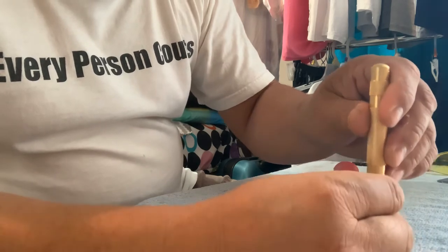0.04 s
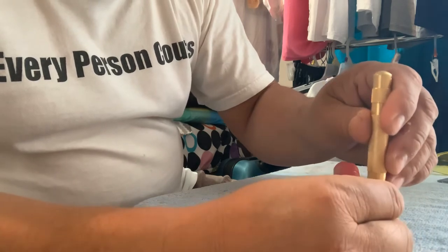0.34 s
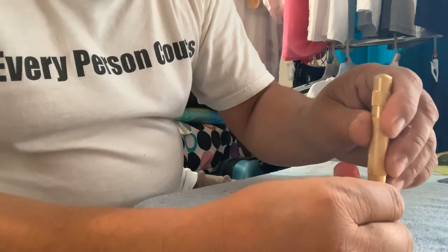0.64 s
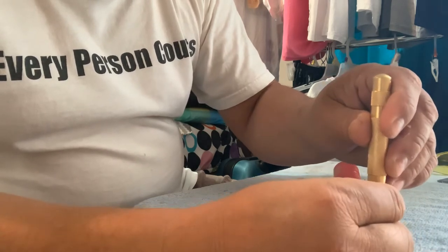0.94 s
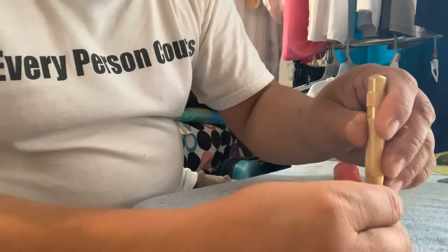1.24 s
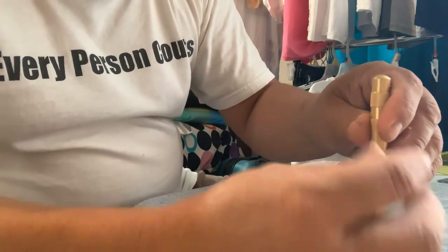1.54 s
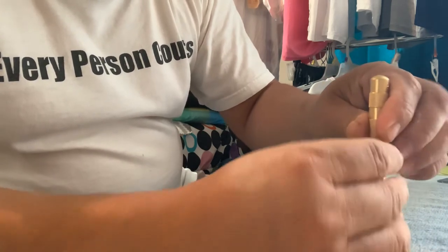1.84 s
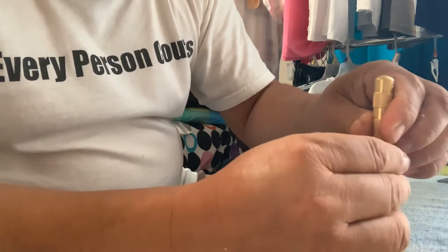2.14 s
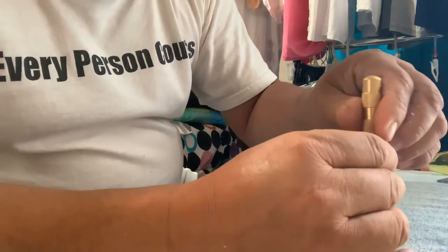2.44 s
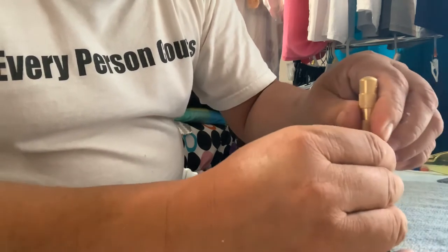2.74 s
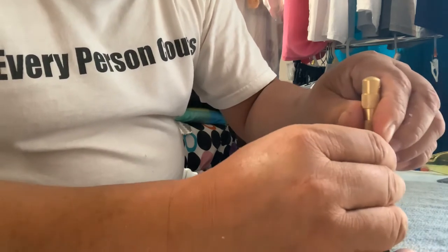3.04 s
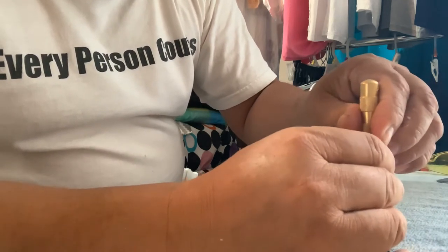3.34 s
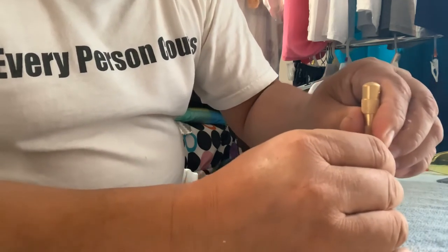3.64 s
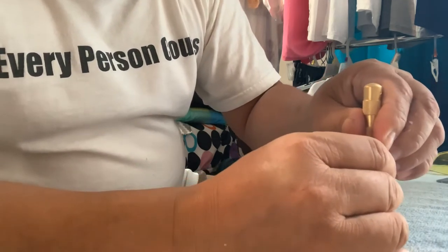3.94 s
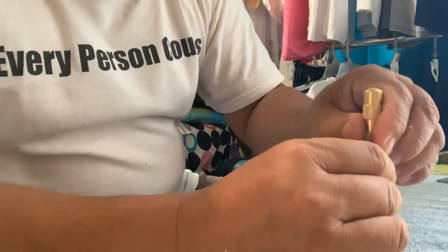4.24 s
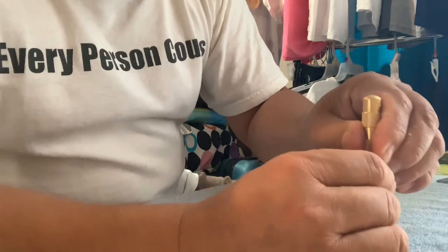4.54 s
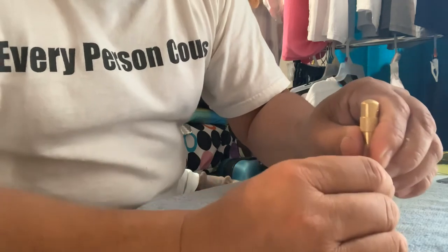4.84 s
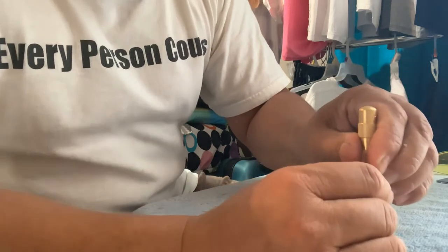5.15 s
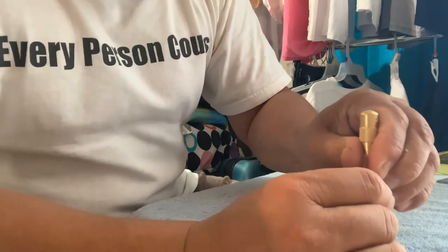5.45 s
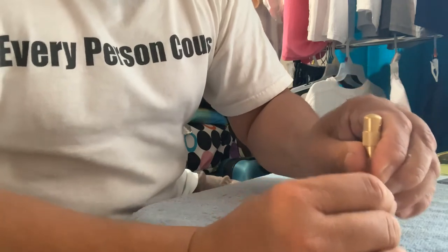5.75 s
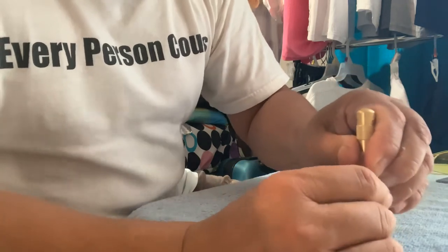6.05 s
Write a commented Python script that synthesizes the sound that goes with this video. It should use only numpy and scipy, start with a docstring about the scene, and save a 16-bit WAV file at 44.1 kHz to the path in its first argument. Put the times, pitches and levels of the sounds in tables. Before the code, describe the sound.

Soft, scattered clicks and muffled knocks sound close up as a brass punch is set against a workpiece on a cloth-covered table. Metal rubs and squeaks lightly as the spring is pressed down, until the punch trips with a single loud crack. The table thumps and the spring rings faintly, with a short reflection from the small room. A low motor hum continues underneath.

```python
"""A small room, the microphone close to a workpiece on a cloth-covered table; a motor hums behind.
The tip of a brass spring-loaded centre punch taps and slides into place, and the plunger rubs in its
barrel as the spring is pressed down. The hammer trips with one sharp snap: the table thumps, barrel and
spring ring on faintly, and the walls give a short reflection."""
import sys
import numpy as np
from scipy import signal
from scipy.fft import rfft, irfft
from scipy.io import wavfile

SR = 44100
rng = np.random.default_rng(int(sys.argv[2]) if len(sys.argv) > 2 else 0)


def digitize_waveform(pressure):
    """Quantize a signal to 16-bit integers and store it at the path in sys.argv[1].

    Rows of a 2-D input are taken as channels; values are limited to [-1, 1].
    """
    field = np.atleast_2d(pressure).T
    bounded = np.clip(field, -1, 1)
    quanta = np.round(bounded * 32767).astype(np.int16)
    wavfile.write(sys.argv[1], SR, quanta)


N = 268569
TIME = np.arange(N) / SR


def from_db(db):
    return 10 ** (np.asarray(db) / 20)


def rms_one(x):
    return x / np.sqrt(np.mean(x ** 2) + 1e-20)


def decay(t, t60):
    return np.exp(-np.log(1000) * t / t60)


def at_hz(points, hz):
    """Read a table on a log-frequency axis."""
    grid, values = np.transpose(points)
    return np.interp(np.log(np.maximum(hz, 1)), np.log(grid), values)


def highpass(x, hz, order=2):
    return signal.sosfilt(signal.butter(order, hz, "high", fs=SR, output="sos"), x + 1e-18)


def add(track, start_s, sound):
    start = round(start_s * SR)
    track[start:start + len(sound)] += sound[:N - start]


def noise(spectrum, size=N):
    """Steady noise of a given colour, rms 1."""
    hz = np.linspace(0, SR / 2, size // 2 + 1)
    phases = np.exp(2j * np.pi * rng.random(len(hz)))
    return rms_one(irfft(from_db(at_hz(spectrum, hz)) * phases, size))


def drift(rate_hz):
    """A random wander with a spread of about 1."""
    return np.interp(TIME * rate_hz, np.arange(4096), rng.standard_normal(4096))


def ring(force, modes):
    """Damped resonances; a unit click starts each at its listed level."""
    out = 0
    for hz, db, t60 in modes:
        radius, angle = decay(1 / SR, t60), 2 * np.pi * hz / SR
        feedback = [1, -2 * radius * np.cos(angle), radius ** 2]
        out += from_db(db) * signal.lfilter([0, np.sin(angle)], feedback, force + 1e-18)
    return out


def burst(t60, size=2048):
    """The dense, quickly dying chatter of one contact: even spectrum, unit energy."""
    fade = decay(TIME[:size], t60)
    phases = np.angle(rfft(rng.standard_normal(size) * fade))
    even = irfft(np.exp(1j * phases)) * np.sqrt(fade)
    return even / np.linalg.norm(even)


def coloured(x, spectrum):
    """Colour a short sound without letting it start early (minimum phase)."""
    half = len(x) // 2
    gain = from_db(at_hz(spectrum, np.linspace(0, SR / 2, half + 1)))
    cepstrum = irfft(np.log(gain))
    cepstrum[1:half] *= 2
    cepstrum[half + 1:] = 0
    return irfft(rfft(x) * np.exp(rfft(cepstrum)))


def swells(rows, waver_db, wander_rad):
    """Short wavering tones that swell and fade."""
    out = np.zeros(N)
    waver, phase = from_db(waver_db * drift(90)), wander_rad * drift(48)
    for peak_s, hz, db, half_width_s in rows:
        on = np.abs(TIME - peak_s) < 3.5 * half_width_s
        level = from_db(db) * waver[on] * np.exp(-((TIME[on] - peak_s) / half_width_s) ** 2)
        out[on] += level * np.sqrt(2) * np.sin(2 * np.pi * hz * TIME[on] + phase[on])
    return out


# the motor in the background: pitch_hz, level_db
MOTOR_PARTIALS = [(39.7, -77), (79.5, -66.5), (117.5, -54), (234.8, -68), (293.3, -73.5)]

def motor_hum(waver_db):
    """The partials sway together in pitch, each wavering in level on its own."""
    out, swaying_time = 0, TIME + 0.0012 * drift(3.3)
    for hz, db in MOTOR_PARTIALS:
        level = from_db(db + waver_db * drift(8))
        out += level * np.sqrt(2) * np.sin(2 * np.pi * hz * swaying_time + rng.uniform(0, 2 * np.pi))
    return out


# the air all around the microphone: frequency_hz, density_db
AIR_COLOUR = [(20, -26), (40, -5), (58, -5.5), (90, 0.5), (150, -6.5), (250, -6), (400, -20.5),
              (600, -25.5), (1000, -30), (2000, -37.5), (4000, -40.5), (8000, -43), (14000, -51.5),
              (16000, -52.5)]

def room_tone(above_400_hz_db):
    """The soft, steady rush of the room, mostly bass."""
    air = noise(AIR_COLOUR)
    return from_db(above_400_hz_db) * air / np.std(highpass(air, 400, order=6))


# far from the microphone: peak_s, pitch_hz, level_db, half_width_s
FAR_NOTES = [(0.13, 726, -71, .02), (0.22, 694, -70, 0.067)]

def far_tone():
    """A faint tone swells twice, lower the second time."""
    return swells(FAR_NOTES, waver_db=7.0, wander_rad=1.4)


def gripped(contact, level_db, t60, count=18):
    """Every shift of the fingers frees another set of short resonances."""
    pitches = np.geomspace(1300, 9500, count) * from_db(rng.uniform(-.5, .5, count))
    levels = level_db + rng.normal(0, 1.7, count)
    return contact + ring(contact, [(hz, db, t60) for hz, db in zip(pitches, levels)])


# tip and fingers touching the work, close up: start_s, knock_db, clack_db, contact_ms, pitch_hz
TOUCHES = [(0.734, -16, -38, 0.59, 1010), (1.004, -20, -39.5, 0.48, 898), (1.029, -22, -48, 0.18, 1040),
           (3.002, -31, -41, 0.53, 1870), (3.104, -4, -33.5, 0.19, 1066), (3.153, -9.5, -19.5, 0.49, 2340),
           (4.206, -8.5, -27, 0.21, 3220), (4.218, -11, -29.5, 0.19, 1085), (4.33, -9, -32, 0.32, 1093),
           (4.356, -8, -31, 0.25, 1118), (4.481, -5, -27.5, 0.13, 1934), (4.502, -8, -29.5, 0.14, 905),
           (4.566, -20, -39, 0.21, 970), (4.621, -20.5, -24, 0.48, 923), (4.757, 6, -11, 0.044, 1054),
           (4.896, -8.5, -37, 0.067, 1030), (4.912, -4.5, -17, .08, 1272), (5.224, -9, -29, 0.23, 955),
           (5.337, -8.5, -25.5, 0.14, 3326), (5.363, -18.5, -29.5, .14, 3450)]
# the hardest clack: frequency_hz, gain_db
CLACK_COLOUR = [(100, -15), (700, -6), (1600, -1.5), (3400, 0.5), (5800, -1), (9000, -4), (11000, -4.5),
                (15500, 1.5)]
# the dull knock on the cloth: frequency_hz, gain_db
KNOCK_COLOUR = [(60, -23), (165, 0), (240, 1.5), (320, -8.5), (410, -3), (520, 3.5), (720, -8.5),
                (1500, -35), (5000, -64.5)]

def touches(chatter_t60, knock_t60, ring_t60, soften_db_per_octave=16, spread_octaves=0.31):
    """Each touch clacks, duller the longer the contact lasts; the work rings and the table knocks."""
    out = np.zeros(N)
    grid_hz = np.geomspace(100, 16000, 40)
    for start_s, knock_db, clack_db, contact_ms, pitch_hz in TOUCHES:
        # treble is lost above 1 / contact time
        octaves_over = np.log2(np.maximum(grid_hz * contact_ms / 1000, 1))
        gain_db = clack_db + at_hz(CLACK_COLOUR, grid_hz) - soften_db_per_octave * octaves_over
        chatter = gripped(burst(chatter_t60, size=4096), level_db=-33.5, t60=0.054)
        add(out, start_s - .001, coloured(chatter, np.c_[grid_hz, gain_db]))
        # the knock lags the clack, and its pitch varies with the spot touched
        pitch_ratio = 2 ** (spread_octaves * rng.uniform(-1, 1))
        knock = coloured(burst(knock_t60, size=8192), np.array(KNOCK_COLOUR) * [pitch_ratio, 1])
        add(out, start_s + .005, from_db(knock_db) * knock)
        add(out, start_s, ring(signal.unit_impulse(SR // 10), [(pitch_hz, knock_db - 42.5, ring_t60)]))
    return out


# the work and the punch resting on it: pitch_hz, relative_db, t60_s
WORKPIECE_MODES = [(160, -3, 0.14), (220, -1, 0.12), (418, -1.5, 0.18), (510, -1, .09), (920, -3, 0.08),
                   (1086, -2.5, 0.057), (1510, -7.5, .05), (1770, -2.5, 0.09), (2508, -4, .05),
                   (3310, 0, 0.06), (3876, -4, 0.06), (5400, 1, 0.045), (6290, -5, .07), (9500, -2, .025)]

def workpiece(force):
    """Touches and sliding set the work ringing."""
    return from_db(-39) * ring(force, WORKPIECE_MODES)


# the small room's reverberation time: frequency_hz, t60_s
ROOM_DECAY = [(150, 0.74), (300, 0.4558), (600, 0.39), (1500, 0.37), (5000, 0.3865), (9000, 0.33),
              (15000, 0.18)]
# the sound coming back off the walls: frequency_hz, relative_db
WALL_COLOUR = [(100, 3), (300, -2), (450, 3.5), (700, -1.8), (1000, -1), (3000, -3.76), (8000, -1.03),
               (15000, 1)]

def room_reflections(sound, build_s, size=32768):
    """Reflections thicken, then die away, the treble first."""
    t, response = TIME[:size], 0
    hz = np.linspace(0, SR / 2, size // 2 + 1)
    spectrum = rfft(noise(WALL_COLOUR, size))
    centres_hz = np.geomspace(100, 16000, 12)
    for centre_hz, band_weights in zip(centres_hz, np.eye(len(centres_hz))):
        band = irfft(spectrum * at_hz(np.c_[centres_hz, band_weights], hz))
        response += band * decay(t, at_hz(ROOM_DECAY, centre_hz))
    response *= 1 - np.exp(-(t / build_s) ** 2)
    return signal.fftconvolve(sound, response / np.linalg.norm(response))[:N]


# the tip sliding, the plunger rubbing in its barrel, and duller strokes of fingers on the cloth: start_s,
# hold_s, level_db, tilt_db_per_octave
STROKES = [(1.108, 0.045, -74.5, 3.5), (2.082, 0.089, -79.5, -2.5), (2.602, .12, -76, -4.5),
           (4.129, 0.16, -66, -3), (4.317, 0.06, -59.5, -2), (4.409, 0.2, -64.5, -3),
           (4.852, 0.072, -51, -1), (5.112, 0.057, -76.5, 2.5), (5.191, 0.048, -57, -1.5),
           (5.52, 0.038, -46, 0.6)]
# the rubbing, before each stroke's tilt: frequency_hz, relative_db
FRICTION_COLOUR = [(100, -5), (400, 3.5), (1500, 3), (4000, -8), (7500, -19.5), (11000, -27.5),
                   (15000, -30.5)]

def sliding(grain_db, attack_s=.004, release_t60=0.059, size=16384):
    """During each stroke the rubbing catches and slips in fine uneven grains."""
    out, t = np.zeros(N), TIME[:size]
    for start_s, hold_s, level_db, tilt in STROKES:
        envelope = np.minimum(t / attack_s, 1) * decay(np.maximum(t - hold_s, 0), release_t60)
        colour = [(hz, db + tilt * np.log2(hz)) for hz, db in FRICTION_COLOUR]
        add(out, start_s, from_db(level_db) * envelope * noise(colour, size))
    return out * rms_one(from_db(grain_db * drift(300)))


# small squeaks near the microphone: peak_s, pitch_hz, level_db, half_width_s
SQUEAK_NOTES = [(4.36, 3810, -59, 0.014), (4.51, 930, -59.5, .02), (4.59, 935, -59, 0.016),
                (4.655, 918, -56.5, 0.021), (5.475, 3400, -77.5, 0.019), (5.542, 930, -44, 0.011)]

def squeaks():
    """Metal parts sing briefly as they rub."""
    return swells(SQUEAK_NOTES, waver_db=3.0, wander_rad=.7)


# the sear trips, the hammer lands and rebounds: start_s, level_db
HAMMER_HITS = [(5.5585, -40.5), (5.5603, -20), (5.5613, -19), (5.5634, -23.5)]
# metal striking metal at close range: frequency_hz, relative_db
SNAP_COLOUR = [(40, -42.5), (120, -22), (310, -13.5), (480, 1), (680, -1.5), (1000, 0), (1300, -3.5),
               (1850, 0), (2400, -5), (3500, 0), (4800, -6), (6200, -15.5), (8000, -9), (10000, -20.5),
               (12800, -19), (15300, -14.5)]

def hammer_snap(t60):
    """Contacts a millisecond or two apart merge into one hard crack."""
    out = np.zeros(N)
    for start_s, level_db in HAMMER_HITS:
        add(out, start_s, from_db(level_db) * rms_one(coloured(burst(t60), SNAP_COLOUR)))
    return out


# the barrel, damped by the hand: pitch_hz, relative_db
BARREL_RING = [(809, -26), (865, -29), (1606, -29.5), (1738, -27.5), (1921, -28), (1980, -33),
               (2274, -33.5), (3112, -32.5), (3304, -31.5), (3382, -30.5), (3795, -28), (3826, -32.5),
               (7600, -31.5), (8400, -38), (9328, -39.5), (11180, -33.5), (14690, -38)]
# the spring inside rings longer, one close pair beating: pitch_hz, level_db, t60_s
SPRING_RING = [(4870, -44, 0.8), (4880, -55, 1), (6384, -44, 0.82)]
# the table under the blow: pitch_hz, level_db, t60_s
TABLE_THUMP = [(146, -27.5, 0.17), (207, -25, .23), (255, -29, .16), (310, -33, .15), (403, -8.5, .19),
               (424, -20, .16), (461, -13.5, .18), (520, -18, .19), (591, -27, .19), (637, -26, .2)]

def ring_and_thump(barrel_t60, swing_s):
    """The hardest hit rings barrel, spring and table; the heavy table takes a few cycles to swing up."""
    out, blow = np.zeros(N), signal.unit_impulse(SR)
    barrel = from_db(-1.5) * ring(blow, [(hz, db, barrel_t60) for hz, db in BARREL_RING])
    spring = ring(blow, SPRING_RING)
    table = ring(blow, TABLE_THUMP) * (1 - np.exp(-TIME[:SR] / swing_s))
    landing_s, _ = max(HAMMER_HITS, key=lambda hit: hit[1])
    add(out, landing_s, barrel + spring + table)
    return out


def scene():
    """One microphone: hands and punch close by, the walls and the background farther off."""
    force = touches(chatter_t60=0.063, knock_t60=0.094, ring_t60=0.06) + sliding(grain_db=6.0)
    hands = force + workpiece(force) + squeaks()
    snap = hammer_snap(t60=0.0083)
    ringing = ring_and_thump(barrel_t60=0.3, swing_s=0.0097)
    reflections = room_reflections(from_db(-12) * hands + from_db(-6) * snap, build_s=0.008)
    background = motor_hum(waver_db=1.7) + room_tone(above_400_hz_db=-78.5) + far_tone()
    return (hands + snap + ringing + reflections + background)[None]


def record(dry):
    """Only the highest peaks are rounded; the microphone sheds the deepest bass and the top is cut."""
    ceiling, bottom_hz, top_hz = .78, 28, 16688
    rounded = dry / (1 + (dry / ceiling) ** 4) ** .25
    top_cut = signal.cheby2(20, 90, top_hz, fs=SR, output="sos")
    return signal.sosfilt(top_cut, highpass(rounded, bottom_hz))


dry = scene()
out = record(dry)
digitize_waveform(out)
```